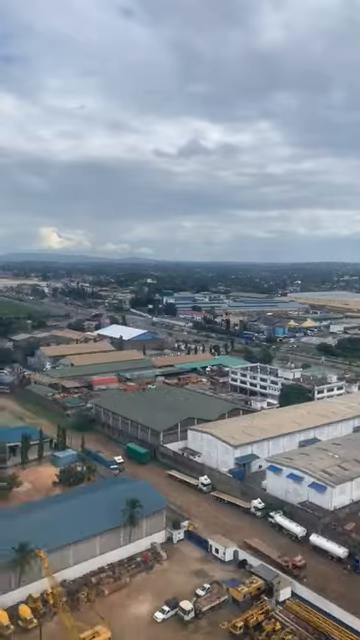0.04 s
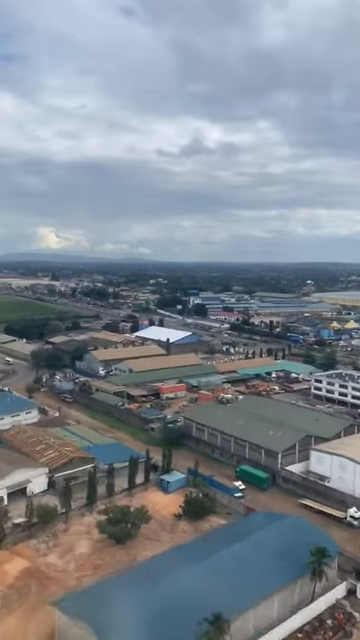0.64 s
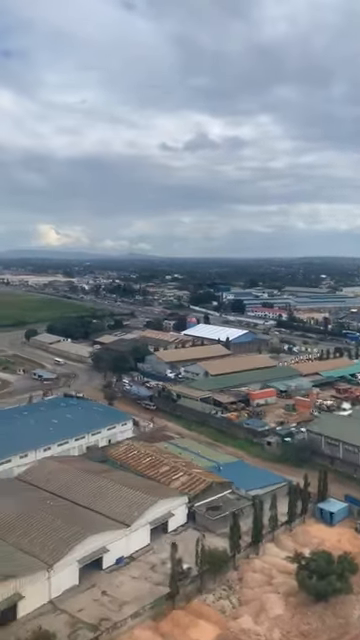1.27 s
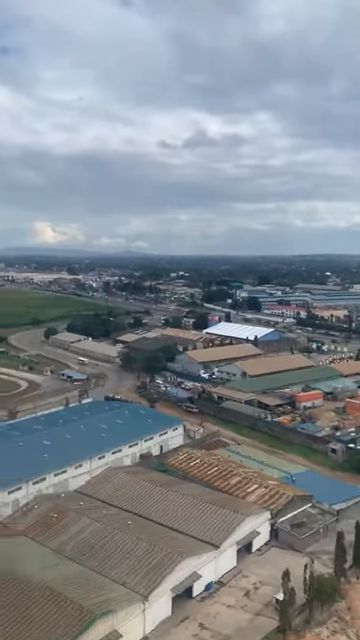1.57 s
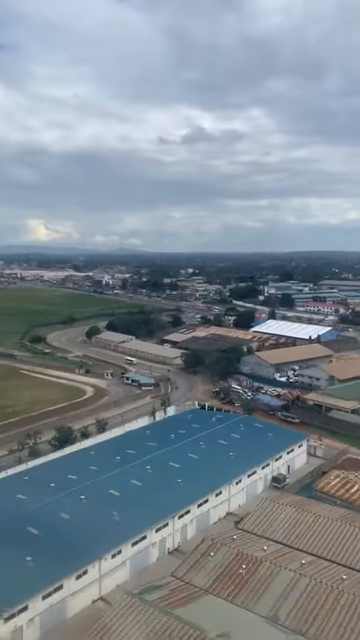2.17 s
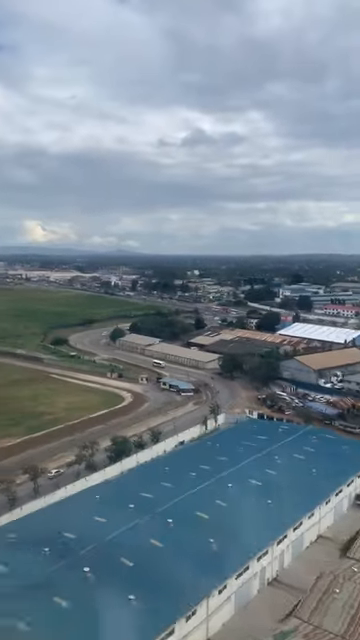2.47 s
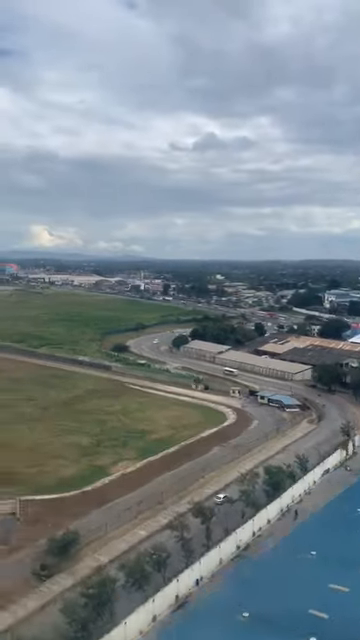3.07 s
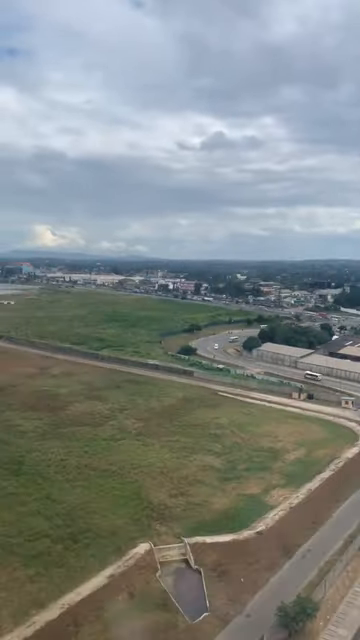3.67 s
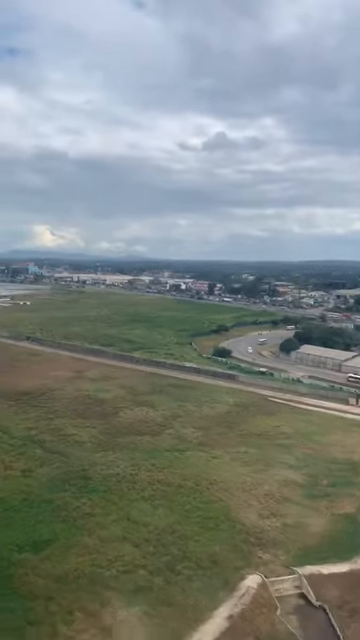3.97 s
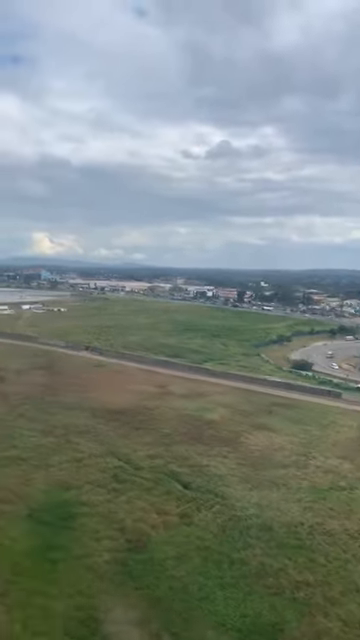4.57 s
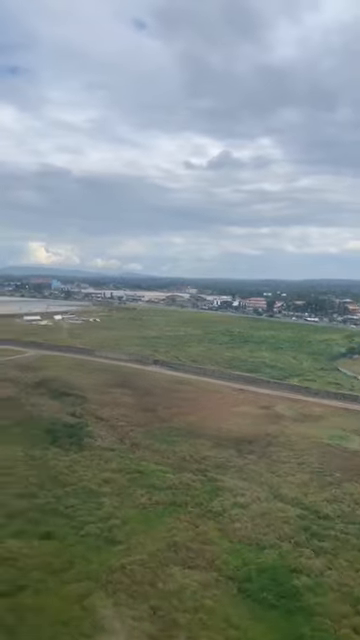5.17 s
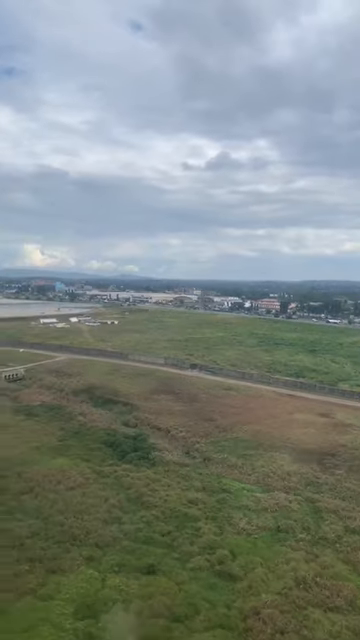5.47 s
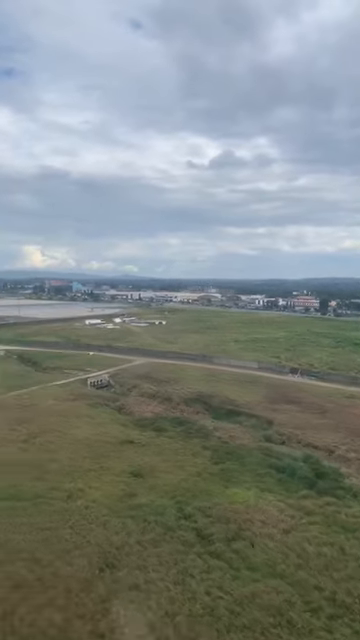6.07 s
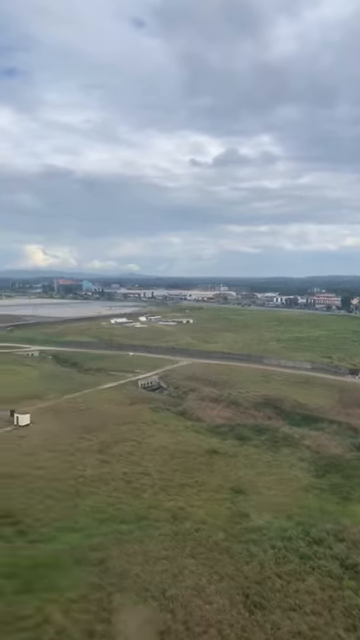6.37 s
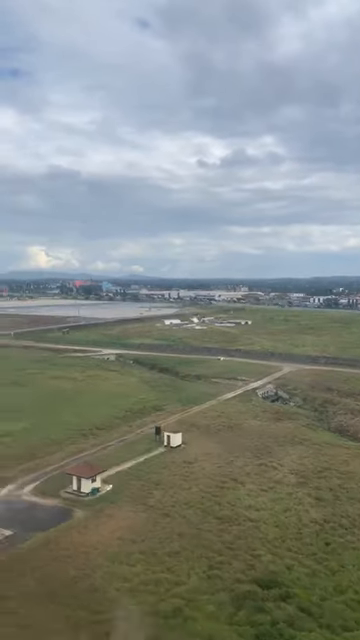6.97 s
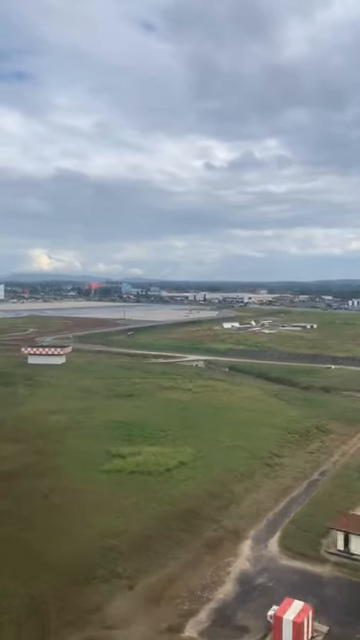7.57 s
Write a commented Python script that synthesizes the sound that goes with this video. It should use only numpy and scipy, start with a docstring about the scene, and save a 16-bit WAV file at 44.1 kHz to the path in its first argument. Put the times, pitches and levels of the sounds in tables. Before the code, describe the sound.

Low propeller drone and rushing air inside an airliner cabin on approach, with a faint high engine whine.

```python
"""Propeller blades beat on the fuselage of a turboprop airliner on final approach, heard at a window seat.
Rough air buffets the cabin; the slipstream roars and rushes through the wall panels, under thin air hiss.
Two faint engine whines and a compressor whistle, shaken at the blade rate, sit on top.
Near the end one whine climbs and blurs into hiss."""
import sys
import numpy as np
from scipy import signal
from scipy.fft import rfft, irfft
from scipy.io import wavfile
from scipy.ndimage import uniform_filter1d

SR = 44100
rng = np.random.default_rng(int(sys.argv[2]) if len(sys.argv) > 2 else 0)


def output_pcm(signal):
    """Save a mono or channel-first signal as 16-bit PCM at the path in sys.argv[1].

    Samples are clipped to [-1, 1] before scaling.
    """
    pcm = np.clip(np.atleast_2d(signal).T, -1, 1) * 32767
    wavfile.write(sys.argv[1], SR, np.round(pcm).astype(np.int16))


N = 345303

BLADE_HZ, BLADE_DRIFT_HZ = 102.08, .12
UPPER_STEP_HZ = 6201  # from a whine to its upper partner
# near engine whine pitch: t/s, f/Hz
NEAR_PITCH = [(0, 6280), (.9, 6265), (1.15, 6243), (3, 6230), (6.3, 6228), (6.85, 6265), (7.1, 6395),
              (7.5, 6420), (7.83, 6390)]


def propeller(blade, flutter_db=1.05, overtone_flutter_db=0.78, jitter_rad=0.11):
    """Each passing blade presses on the wall; uneven inflow shakes pulse size and timing."""
    # fundamental swell: t/s, level/dB
    swell = [(0, -19), (.25, -21.5), (.75, -24.5), (1, -21.5), (1.6, -21), (2.35, -19.5), (2.65, -20.5),
             (3.5, -20), (4.5, -19), (4.85, -22), (5.35, -20), (6.3, -21), (6.9, -22), (7.2, -22),
             (7.83, -23.5)]
    # brief dips of the fundamental: t/s, length/s, depth/dB
    dips = [(1.24, 0.054, 5), (1.37, 0.046, 3), (2.95, 0.16, 5.5), (3.738, 0.06, 7), (4.385, 0.064, 5.5),
            (4.70, 0.092, 6), (6.079, 0.02, 6), (6.528, 0.099, 5), (6.996, 0.068, 10), (7.096, .05, 8)]
    # common overtone swell: t/s, level/dB
    overtone_swell = [(0, -43), (.7, -38.5), (2, -41.5), (2.6, -38.5), (3.3, -40.5), (4.5, -37.5), (5, -39),
                      (6.8, -37.5), (7.83, -41.5)]
    # overtones: blade-rate multiple, level/dB re overtone swell
    overtones = [(2, 1.5), (3, -9.5), (4, -26.5)]
    dip_db = sum(depth_db * hump(t_s, length_s) for t_s, length_s, depth_db in dips)
    fundamental_db = curves(swell)[0] - dip_db + flutter_db * walk(7)
    drone = undb(fundamental_db) * np.sin(blade + jitter_rad * walk(19))
    overtone_db = curves(overtone_swell)[0]
    for order, db in overtones:
        gain = undb(overtone_db + db + overtone_flutter_db * walk(10.5))
        drone += gain * np.sin(order * (blade + jitter_rad * walk(6.8)))
    return np.sqrt(2) * drone


def buffet(bed_db=-34, rise_db_per_s=0.05, flutter_db=0.5, evenness=0.91):
    """Rough air booms in the fuselage: a bed that grows as the ground nears, a swell at each bump."""
    # fuselage boom spectrum: f/Hz, relative level/dB
    spectrum = [(48, -18), (62, -3.5), (73, 4), (88, -7), (110, -8), (160, -46)]
    # bumps of rough air: t/s, length/s, peak level/dB
    bumps = [(.96, .06, -31), (2.252, .14, -30.5), (3.16, 0.15, -29), (3.884, .07, -27), (4.68, 0.075, -30),
             (5.909, 0.078, -23), (6.08, 0.056, -25.5), (6.66, 0.087, -30), (7.076, 0.059, -25.5),
             (7.176, 0.046, -25.5), (7.37, 0.056, -25), (7.582, 0.071, -26.5)]
    boom = unit(cabin_noise(spectrum))
    envelope = np.sqrt(uniform_filter1d(boom ** 2, SR // 8))
    even_boom = unit(boom / envelope ** evenness)
    bed = undb(bed_db + rise_db_per_s * np.arange(N) / SR + flutter_db * walk(6.5))
    bump_power = sum(undb(db) ** 2 * hump(t_s, length_s) for t_s, length_s, db in bumps)
    return even_boom * np.sqrt(bed ** 2 + bump_power)


def slipstream(roar_trim_db=-0.44, roar_flicker_db=1.08, rush_flicker_db=0.58):
    """The boundary layer roars in the airframe and rushes over the skin; both drift slightly in level."""
    # airframe roar: f/Hz, density/(dB per Hz)
    roar_spectrum = [(20, -58), (33, -53.5), (46, -56.5), (70, -64.5), (118, -51), (133, -57.5), (150, -58),
                     (180, -62), (220, -64), (290, -62), (365, -61.5), (430, -66), (480, -78)]
    # roar swell: t/s, gain/dB
    roar_swell = [(0, 0), (2.7, 1.1), (3.5, 0.7), (4.5, 1), (5.2, -0.4), (6.1, -0.7), (6.5, 1.3),
                  (7.25, -0.3), (7.6, 2.5)]
    # rush on the skin: f/Hz, density/(dB per Hz)
    rush_spectrum = [(400, -73), (500, -74), (620, -75.5), (900, -78), (1180, -79), (1600, -82.5),
                     (2000, -85.5), (2300, -87), (2600, -91), (3100, -96.5)]
    # slow, slight level drift of roar and rush: t/s, gain/dB
    drift = [(0, 1), (.7, -0.3), (1.2, 0.35), (2.8, -.5), (4.2, 0.04), (4.55, 0.6), (5.6, .3), (6.6, -.5),
             (7.83, -0.2)]
    roar = cabin_noise(roar_spectrum)
    roar *= undb(roar_trim_db + curves(roar_swell)[0] + roar_flicker_db * walk(6.1))
    rush = cabin_noise(rush_spectrum) * undb(rush_flicker_db * walk(12))
    return (roar + rush) * undb(curves(drift)[0])


def air_hiss(blade, start_gain_db=-0.64, rise_db_per_s=0.0756, pulsing=0.062, wander_db=0.4, flicker_db=1):
    """Thin cabin air hiss, pulsing a little with each blade."""
    # hiss: f/Hz, density/(dB per Hz)
    spectrum = [(2400, -112), (3200, -96), (3700, -93.5), (4200, -101.5), (5000, -106), (5750, -99.5),
                (6700, -99.5), (7000, -103.5), (8000, -102), (9500, -103.5), (9850, -100.5), (11100, -103),
                (12000, -98.5), (13000, -101.5)]
    trend_db = start_gain_db + rise_db_per_s * np.arange(N) / SR
    gain = undb(trend_db + wander_db * walk(4) + flicker_db * walk(21))
    return cabin_noise(spectrum) * (1 + pulsing * np.cos(blade)) * gain


def whine(blade, pitch, strength, sidebands, upper_db=-5, halo_db=-9, halo_hz=150, flicker_db=2):
    """An engine tone and a partner about an octave up; propeller vibration gives both sidebands."""
    level_db, blur_hz = curves(strength)
    phase = turn(curves(pitch)[0] + blur_hz * walk(57))
    shaken = sum(undb(db) * np.exp(1j * (k * blade + rng.uniform(0, 2 * np.pi))) for k, db in sidebands)
    halo = undb(halo_db) * (walk(halo_hz) + 1j * walk(halo_hz)) / np.sqrt(2)
    upper = undb(upper_db) * np.exp(1j * turn(np.full(N, UPPER_STEP_HZ)))
    pair = np.exp(1j * phase) * (1 + upper)
    wander_db = walk(6)
    gain = undb(level_db + wander_db + flicker_db * walk(31))
    return np.sqrt(2) * np.real((shaken + halo) * pair) * gain


def near_engine(blade):
    """The stronger whine: clears midway, climbs and blurs near the end."""
    # strength and purity: t/s, base level/dB, blur/Hz
    strength = [(0, -82, 19), (.9, -76, 21), (1.149, -74, 7.4), (2.8, -77, 8), (3, -70, 2.2),
                (3.5, -67, 2.06), (5.2, -68, 2), (6.35, -66.5, 2.3), (6.85, -71, 24), (7.83, -72, 62)]
    # sidebands: offset/blade rates, gain/dB
    sidebands = [(-2, -16), (-1, -10.5), (0, 2), (1, -17), (2, -16), (3, -30)]
    return whine(blade, NEAR_PITCH, strength, sidebands)


def far_engine(blade):
    """The weaker whine: slightly lower, almost steady in pitch."""
    # pitch: t/s, f/Hz
    pitch = [(0, 6176), (2.5, 6173), (6.4, 6174), (6.85, 6140), (7.3, 6165), (7.83, 6170)]
    # strength and purity: t/s, base level/dB, blur/Hz
    strength = [(0, -75.5, 9.4), (1.5, -75, 10.5), (2.5, -76, 11.5), (3.2, -77.5, 2.9), (6.3, -79, 4.7),
                (6.85, -73, 9.2), (7.1, -81, 41), (7.83, -79, 62)]
    # sidebands: offset/blade rates, gain/dB
    sidebands = [(-2, -0.5), (-1, -6), (0, 3.5), (1, -1), (2, -25)]
    return whine(blade, pitch, strength, sidebands)


def whine_hiss(blade, spread_hz=300, pulsing=0.42, flicker_db=3):
    """Narrow-band hiss rides on the near whine's upper partner and grows as it climbs."""
    # band swell: t/s, level/dB
    swell = [(0, -69.5), (4.2, -82), (5, -73), (6.6, -72), (7.1, -65), (7.5, -64), (7.83, -67)]
    phase = turn(curves(NEAR_PITCH)[0] + UPPER_STEP_HZ)
    band = walk(spread_hz) * np.sin(phase) + walk(spread_hz) * np.cos(phase)
    return band * (1 + pulsing * np.cos(blade)) * undb(curves(swell)[0] + flicker_db * walk(8))


def compressor_whistle(blade, level_db=-79, flicker_db=3, blur_hz=9, shake_rad=.8):
    """A faint compressor tone wavers, shakes at the blade rate and creeps upward."""
    # pitch: t/s, f/Hz
    pitch = [(0, 7960), (2.2, 7970), (2.7, 8070), (3.3, 8265), (6.4, 8272), (7.83, 8255)]
    phase = turn(curves(pitch)[0] + blur_hz * walk(40)) + shake_rad * np.sin(blade)
    return np.sqrt(2) * np.sin(phase) * undb(level_db + flicker_db * walk(5))


def cabin_noise(spectrum):
    """Turbulence of a given spectrum, heard through the resonant cabin wall."""
    # wall panel and window resonances: f/Hz, width/Hz, lift/dB
    panels = [(728, 18, 4.5), (795, 27, 6), (933, 77, 7), (1308, 22.6, 8), (1358, 47, 9), (1446, 103, 5),
              (1650, 24, 4.5), (2896, 64, 5), (3740, 79, 0), (4380, 260, 4)]
    f = np.maximum(np.arange(N // 2 + 1) * SR / N, 1)
    hz, db = np.transpose(spectrum)
    density_db = np.interp(np.log(f), np.log(hz), db)
    panel_db = sum(lift / (1 + (2 * (f - centre) / width) ** 2) for centre, width, lift in panels)
    skirts = np.minimum(np.minimum(f / hz[0], hz[-1] / f), 1) ** 6
    white = rfft(rng.standard_normal(N))
    return irfft(white * undb(density_db + panel_db) * skirts, N) * np.sqrt(SR / 2)


def undb(db):
    """Decibels to gain."""
    return 10 ** (np.asarray(db) / 20)


def unit(x):
    """Scale to rms 1."""
    return x / np.sqrt(np.mean(x ** 2))


def curves(table):
    """Table columns, interpolated linearly in time."""
    t_s, *columns = np.transpose(table)
    return [np.interp(np.arange(N) / SR, t_s, column) for column in columns]


def walk(rate_hz):
    """Smooth random wander, rms 1, up to about rate_hz."""
    f = np.arange(N // 2 + 1) * SR / N
    return unit(irfft(rfft(rng.standard_normal(N)) * np.exp(-.5 * (f / rate_hz) ** 2), N))


def turn(hz):
    """Running phase/rad of a moving frequency."""
    return 2 * np.pi * np.cumsum(hz) / SR


def hump(centre_s, length_s):
    """Gaussian of height 1, length_s wide at half height."""
    return np.exp(-np.log(2) * (2 * (np.arange(N) / SR - centre_s) / length_s) ** 2)


def scene():
    """Mono mix at the window seat; one blade phase/rad drives all blade-rate pulsing."""
    blade = turn(BLADE_HZ + BLADE_DRIFT_HZ * walk(0.99))
    whines = near_engine(blade) + far_engine(blade)
    airflow = buffet() + slipstream() + air_hiss(blade)
    return (propeller(blade) + airflow + whines + whine_hiss(blade) + compressor_whistle(blade))[None]


def record(dry):
    """Steep low-pass; cuts the top treble."""
    cutoff_hz = 13050
    return signal.sosfilt(signal.ellip(8, .2, 70, cutoff_hz, fs=SR, output="sos"), dry)


dry = scene()
out = record(dry)
output_pcm(out)
```